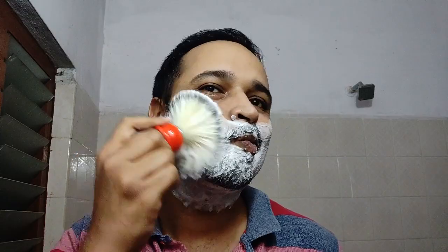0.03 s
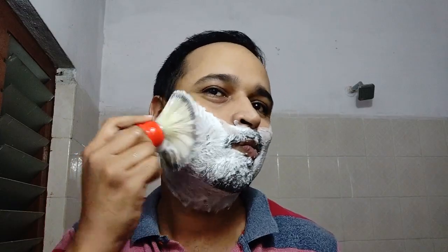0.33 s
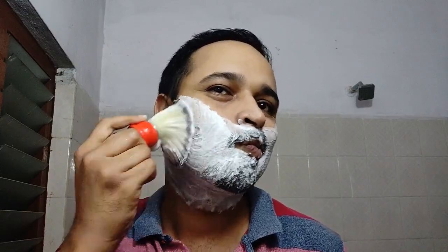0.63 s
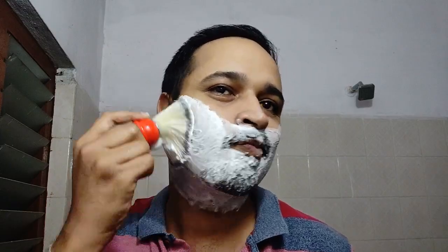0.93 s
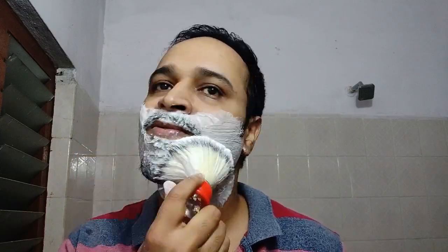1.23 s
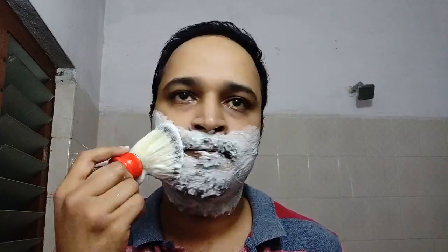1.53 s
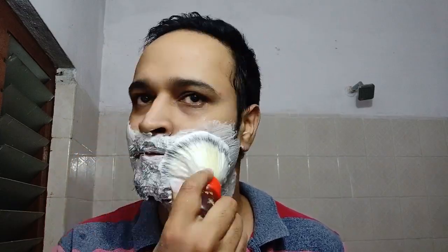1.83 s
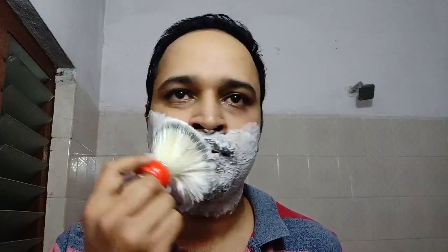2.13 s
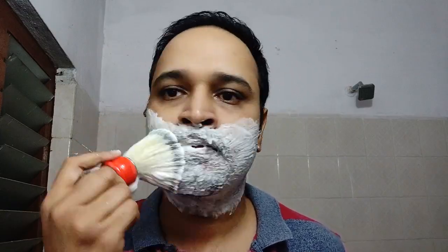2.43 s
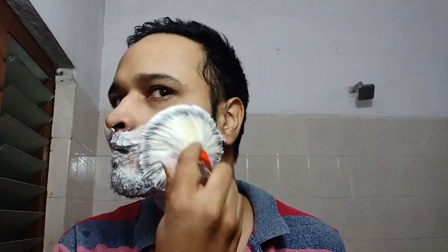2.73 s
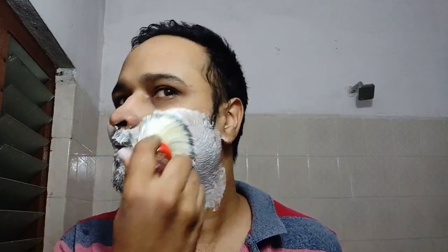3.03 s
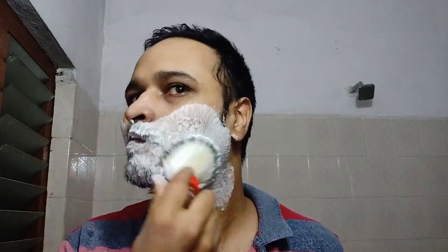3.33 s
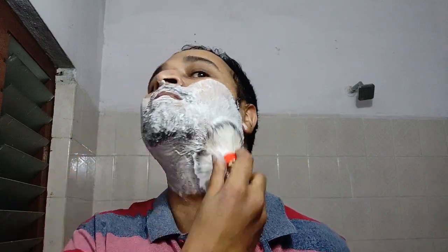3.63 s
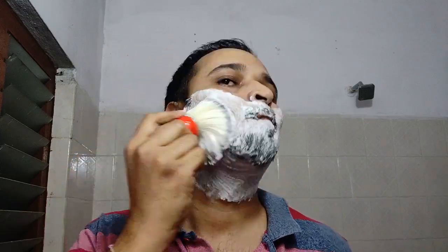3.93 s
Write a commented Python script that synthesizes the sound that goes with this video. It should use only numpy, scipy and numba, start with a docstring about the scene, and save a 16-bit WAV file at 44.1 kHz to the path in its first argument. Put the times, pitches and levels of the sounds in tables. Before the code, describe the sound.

A shaving brush swishes over lathered stubble throughout the four seconds, about ten soft, wet strokes a second, growing slightly louder, with scattered crackles of foam. Low air rumble on the microphone creeps in after 1 second, gives a short puff at about 1.6 seconds, peaks near 3 seconds and then eases. Steady hiss and a faint low hum of the tiled bathroom lie underneath.

```python
"""A tiled bathroom: a shaving brush works lather over stubble, about ten strokes a second.
Bristles flick and tiny bubbles burst as a fine hiss over the wet swish of the foam; squeezed pockets crackle.
Moving air booms and buffets on the two microphone ports, gusts once and peaks near three seconds.
Steady room hiss and a low building murmur lie underneath."""
import sys
import numpy as np
from scipy import signal
from scipy.fft import rfft, irfft
from scipy.io import wavfile
from scipy.ndimage import uniform_filter1d, map_coordinates
from numba import njit

SR = 44100
rng = np.random.default_rng(int(sys.argv[2]) if len(sys.argv) > 2 else 0)


def materialize(psi):
    """Save the field psi as 16-bit PCM at rate SR to the path in sys.argv[1].

    A 1-D psi becomes a single channel; in a 2-D psi each row is a channel.
    """
    bounded = np.clip(np.atleast_2d(psi).T, -1, 1)
    quanta = np.round(bounded * 32767).astype(np.int16)
    wavfile.write(sys.argv[1], SR, quanta)


N = 176400
TIME_S = np.arange(N) / SR
BUBBLES_PER_S, HAND_MOVES_PER_S = 3500, 7


def undb(db):
    """Decibels to gain."""
    return 10 ** (np.asarray(db) / 20)


def unit(x):
    """Scale to rms 1."""
    return x / np.sqrt(np.mean(x ** 2))


def curve(table, column=1):
    """Gain over time from one dB column."""
    rows = np.array(table)
    return undb(np.interp(TIME_S, rows[:, 0], rows[:, column]))


def colour(x, spectrum, column=1):
    """Filter by one dB column of a spectrum."""
    rows = np.array(spectrum)
    hz = np.maximum(np.arange(N // 2 + 1) * SR / N, 1)
    gain_db = np.interp(np.log(hz), np.log(rows[:, 0]), rows[:, column])
    return irfft(rfft(x) * undb(gain_db), N)


def walk(per_s):
    """Smooth random wander, rms 1."""
    step = int(SR / per_s)
    stairs = np.repeat(rng.standard_normal(N // step + 1), step)
    return unit(uniform_filter1d(stairs, step)[:N])


def envelope(start_s, attack_s, length_s, release_s):
    """Linear rise, hold until length_s after the start, exponential fall."""
    age_s = TIME_S - start_s
    return np.clip(age_s / attack_s, 0, 1) * np.exp(-np.maximum(age_s - length_s, 0) / release_s)


def grains(per_s, spread_db):
    """Dense clicks of uneven size, with independent sign at each port."""
    hits = rng.random(N) < per_s / SR
    size = undb(spread_db * np.clip(rng.standard_normal(N), -3, 3))
    return unit(hits * size * np.sign(rng.standard_normal((2, N))))


def pressure(layer, sag_db_per_s=25):
    """Rubbing strength of "bristle" or "foam": strokes ease off over the resting skin contact."""
    # (start [s], length [s], bristle level [dB], foam level [dB])
    strokes = [(0.013, 0.099, -54.5, -51), (0.124, 0.039, -52, -65), (0.187, 0.091, -47, -53.5),
               (0.275, 0.04, -48, -53), (0.335, 0.058, -47.5, -52), (0.437, 0.029, -45.5, -52),
               (0.532, 0.1, -49, -52.5), (0.635, 0.073, -47, -53), (0.722, 0.063, -51, -55),
               (0.847, 0.035, -47.5, -60), (0.966, 0.065, -47, -52), (1.08, 0.063, -48.5, -61),
               (1.174, 0.048, -45, -51), (1.255, 0.068, -46.5, -56.5), (1.339, 0.056, -48.5, -51),
               (1.448, 0.05, -47, -57.5), (1.566, 0.054, -44.5, -49), (1.653, 0.061, -48, -52.5),
               (1.747, 0.066, -45.5, -49.5), (1.862, 0.044, -45.5, -57.5), (1.936, 0.062, -44, -54),
               (2.034, 0.061, -47, -52.5), (2.124, 0.046, -42.5, -47), (2.205, 0.06, -46.5, -54.5),
               (2.294, 0.045, -45, -51), (2.388, 0.028, -47, -55), (2.458, 0.056, -44, -50.5),
               (2.553, 0.15, -48, -55.5), (2.678, 0.037, -45, -66), (2.807, 0.044, -39.5, -51.5),
               (2.847, 0.044, -47, -49.5), (2.929, 0.035, -39.5, -45.5), (3.026, 0.049, -42, -49.5),
               (3.14, 0.046, -42.5, -47), (3.251, 0.049, -42, -47.5), (3.38, 0.025, -39, -45),
               (3.472, 0.056, -42.5, -50), (3.59, 0.041, -41.5, -48.5), (3.697, 0.055, -44, -48.5),
               (3.773, 0.015, -49.5, -53), (3.928, 0.025, -39.5, -45.5)]
    # contact between strokes (time [s], bristle level [dB], foam level [dB])
    contact = [(0.0, -46.5, -52.5), (0.25, -51, -54), (0.5, -50.5, -53.5), (0.95, -49.5, -51),
               (1.1, -55.5, -62.5), (1.54, -54.5, -69), (1.7, -54.5, -59.5), (2.35, -53, -59),
               (2.95, -47.5, -53), (3.5, -48.5, -54.5), (4.0, -49.5, -55.5)]
    index = ("bristle", "foam").index(layer)
    power = curve(contact, column=index + 1) ** 2
    for start_s, length_s, *levels_db in strokes:
        eased = undb(levels_db[index] - sag_db_per_s * np.maximum(TIME_S - start_s, 0))
        power += (eased * envelope(start_s, 0.015, length_s, release_s=0.02)) ** 2
    return np.sqrt(2 * power)


def bristles():
    """Bristles flick over stubble; each port hears its own hiss spectrum."""
    # (frequency [Hz], left gain [dB], right gain [dB])
    hiss_spectrum = [(300, -52.5, -50), (1200, -43.5, -35), (1840, -11.5, -23), (2350, -15, -13.5),
                     (2610, -18, -18.5), (3160, -8.5, -8), (3800, -10.5, -10), (4190, -12, -11.5),
                     (4870, -8.5, -6.5), (5920, -15, -4), (6330, -8.5, -2), (6610, -29, 0),
                     (7190, -6.5, -10), (7640, -9.5, -16.5), (8460, -10.5, -27.5), (9060, -8.5, -56.5),
                     (9490, -18, -62)]
    left, right = grains(per_s=9000, spread_db=2)
    return unit(np.array([colour(left, hiss_spectrum, 1), colour(right, hiss_spectrum, 2)]))


def hand_echo(x, delay_s=0.001808, swing_s=0.000684, echo_db=-9):
    """Reflection between hand and cheek; its delay moves with the hand."""
    late_s = delay_s + swing_s * walk(HAND_MOVES_PER_S)
    echo = np.array([map_coordinates(port, [np.arange(N) - late_s * SR], order=1) for port in x])
    return x + undb(echo_db) * echo


@njit
def resonance(x, hz, width_hz):
    """State-variable band-pass, gain 1 at its moving centre."""
    y, band_state, low_state = np.empty(len(x)), 0., 0.
    for i in range(len(x)):
        g, damping = np.tan(np.pi * hz[i] / SR), width_hz / hz[i]
        band = (band_state + g * (x[i] - low_state)) / (1 + g * (g + damping))
        band_state = 2 * band - band_state
        low_state += 2 * g * band
        y[i] = damping * band
    return y


def lather_pocket(x, centre_hz=1610, width_hz=360., swing_octaves=0.073, ring_db=1):
    """A hollow in the lather rings at a pitch that shifts as it is kneaded."""
    hz = centre_hz * 2 ** (swing_octaves * walk(HAND_MOVES_PER_S))
    return x + undb(ring_db) * np.array([resonance(port, hz, width_hz) for port in x])


def foam():
    """Tiny bubbles burst as a wet, hollow swish."""
    # (frequency [Hz], gain [dB])
    swish_spectrum = [(150, -20), (400, -14.5), (600, -9), (800, -5.5), (1100, -2), (1550, -2.5),
                      (1950, -2.5), (2650, -7.5), (3600, -20.5), (8000, -59)]
    bursts = colour(grains(BUBBLES_PER_S, spread_db=1.5), swish_spectrum)
    return unit(lather_pocket(hand_echo(bursts)))


def tiles(x, t60_s=0.12, tail_db=-8):
    """Direct sound plus short reflections from tiled walls."""
    t = np.arange(SR // 3) / SR
    tail = rng.standard_normal((2, len(t))) * np.exp(-np.log(1000) * t / t60_s)
    tail *= undb(tail_db) / np.sqrt(np.sum(tail ** 2, axis=1, keepdims=True))
    reflections = signal.fftconvolve(x, tail, axes=1)[:, :N]
    return (x + reflections) / np.sqrt(1 + undb(tail_db) ** 2)


def brush(bristle_db=-2, foam_db=-1.3, flutter_db=1.14):
    """Bristles and foam follow the uneven pressure of the hand."""
    rub = undb(bristle_db) * bristles() * pressure("bristle")
    rub += undb(foam_db) * foam() * pressure("foam")
    return tiles(rub * undb(flutter_db * walk(per_s=110)))


def squeeze(layer, attack_s=0.0014, length_s=0.0084):
    """Burst strength of "fizz" or "wet" crackle as foam pockets are squeezed."""
    # (start [s], fizz level [dB], wet crackle level [dB])
    bursts = [(0.348, -81, -55), (0.548, -81, -49), (0.738, -92, -47), (0.905, -85, -52), (1.178, -78, -46),
              (1.374, -87, -47.5), (1.458, -71, -63), (1.563, -85, -45), (2.826, -57, -43.5),
              (3.267, -78, -42), (3.395, -67, -51), (3.61, -78, -47), (3.715, -84, -49),
              (3.937, -69, -46.5)]
    index = ("fizz", "wet").index(layer)
    return sum(undb(levels_db[index]) * envelope(start_s, attack_s, length_s, release_s=length_s)
               for start_s, *levels_db in bursts)


def fizz(stroke_db=-36.5):
    """The finest bubbles fizz faintly with each stroke and squeeze."""
    # (frequency [Hz], gain [dB])
    fizz_spectrum = [(8000, -54), (11000, -24), (12200, -3), (14500, -1), (15300, -25), (17000, -43)]
    strength = undb(stroke_db) * pressure("bristle") + squeeze("fizz")
    return strength * unit(colour(grains(BUBBLES_PER_S, spread_db=2.7), fizz_spectrum))


def room_hiss(level_db=-60.5):
    """Steady hiss of the room."""
    # (frequency [Hz], gain [dB])
    air_spectrum = [(30, 15), (120, 12), (300, -11), (1000, 8), (3000, -18.5), (6500, 22), (9000, -19)]
    return undb(level_db) * unit(colour(rng.standard_normal((2, N)), air_spectrum))


def murmur(level_db=-56):
    """Steady low murmur of the building."""
    # (frequency [Hz], gain [dB])
    murmur_spectrum = [(15, -1), (28, 8), (45, -5), (66, -5), (85, -1), (120, -3.5), (160, -16),
                       (240, -31.5), (500, -38), (2000, -70)]
    return undb(level_db) * unit(colour(rng.standard_normal((2, N)), murmur_spectrum))


def swirl(spectrum, even_s=0.041):
    """Narrow band of eddies of even strength, as a rotating phasor."""
    phasor = signal.hilbert(colour(rng.standard_normal(N), spectrum))
    power = uniform_filter1d(np.abs(phasor) ** 2, int(even_s * SR)) / 2
    return phasor / np.sqrt(power)


def boom(phasor, phase_rad, wander_rad=1.0):
    """Eddies reach both ports equally strongly; the phase between them wanders."""
    apart_rad = phase_rad + wander_rad * walk(per_s=18)
    return np.real(phasor * np.exp(.5j * np.array([apart_rad, -apart_rad])))


def upper_boom(phase_rad, swell_db=1, buffet_phase_rad=0.94):
    """Air booms near 120 Hz; buffets push the ports more nearly in phase."""
    # (frequency [Hz], gain [dB])
    boom_spectrum = [(20, -56), (60, -21), (85, -12), (102, -8), (119, -0.5), (140, -8.5), (175, -24),
                     (260, -70), (1000, -100)]
    # (time [s], level [dB])
    swell = [(0, -68), (.3, -55), (.55, -57), (.65, -50), (.92, -63.5), (1.1, -59), (1.22, -43.5),
             (1.3, -50), (1.39, -37.5), (1.47, -54.5), (1.56, -41.5), (1.78, -47.5), (1.9, -41), (2.1, -42),
             (2.2, -37), (2.33, -35.5), (2.43, -30), (2.52, -32), (2.62, -24.5), (2.75, -20), (2.83, -26),
             (2.95, -22), (3.04, -27.5), (3.3, -30.5), (3.45, -35.5), (3.55, -33), (3.62, -39), (4, -35.5)]
    # (time [s], offset [Hz])
    pitch_drift = [(0, 3.5), (1.9, -2.5), (2.22, 3.5), (2.45, -10), (2.55, -13.5), (2.65, 3), (2.78, 2),
                   (2.919, -14), (3.099, -21.5), (3.3, -9), (3.55, -16.5), (4, 2.5)]
    # (start [s], length [s], level [dB])
    buffets = [(1.369, 0.026, -37.5), (1.844, 0.051, -33.5), (1.94, 0.02, -33), (2.192, 0.057, -39),
               (2.364, 0.035, -26), (2.418, 0.024, -22.5), (2.639, 0.048, -23.5), (2.725, 0.045, -22),
               (2.875, .045, -19.5), (3.072, 0.03, -21), (3.526, 0.036, -29.5)]
    buffeting = sum(undb(db) * envelope(start_s, 0.014, length_s, release_s=0.013)
                    for start_s, length_s, db in buffets)
    strength = np.hypot(undb(swell_db) * curve(swell), buffeting)
    apart_rad = phase_rad + (buffet_phase_rad - phase_rad) * (buffeting / strength) ** 2
    drift_hz = np.interp(TIME_S, *np.array(pitch_drift).T)
    phasor = swirl(boom_spectrum) * np.exp(2j * np.pi * np.cumsum(drift_hz) / SR)
    return strength * boom(phasor, apart_rad)


def lower_boom(phase_rad, swell_db=1):
    """Air booms near 66 Hz."""
    # (frequency [Hz], gain [dB])
    boom_spectrum = [(12, -26), (26, -16.5), (34, -23.5), (45, -19.5), (56, -12.5), (66, 2.5), (78, -14.5),
                     (105, -29), (200, -64), (800, -100)]
    # (time [s], level [dB])
    swell = [(0, -82), (.55, -70), (.8, -52), (1.04, -49.5), (1.14, -36), (1.38, -41.5), (1.6, -54),
             (1.82, -40), (1.93, -42), (2.03, -34), (2.16, -42), (2.45, -60), (2.53, -27.5), (2.62, -47),
             (2.75, -32), (2.85, -33), (2.9, -24.5), (3.03, -25.5), (3.13, -30), (3.33, -28), (3.5, -39.5),
             (3.65, -40.5), (3.77, -39.5), (4, -41.5)]
    return undb(swell_db) * curve(swell) * boom(swirl(boom_spectrum), phase_rad)


def eddies(spectrum, correlation=-0.13, even_s=0.06):
    """Turbulence of even strength, pushing the ports partly in opposition."""
    mid, side = colour(rng.standard_normal((2, N)), spectrum)
    ports = np.sqrt(1 + correlation) * mid + np.sqrt(1 - correlation) * side * np.array([[1], [-1]])
    power = uniform_filter1d(np.mean(ports ** 2, axis=0), int(even_s * SR))
    return ports / np.sqrt(power)


def draught(port_phase_rad=1.76, rough_db=3):
    """Moving air on the ports: two booms with rough flutter above them."""
    # (frequency [Hz], gain [dB])
    rough_spectrum = [(30, -42.5), (100, -22.5), (175, -3.5), (228, 0), (260, -3), (290, -2.5),
                      (350, -15.5), (410, -20), (465, -18.5), (530, -12.5), (610, -16), (800, -21),
                      (1100, -26), (2000, -47.5), (6000, -89.5)]
    # (time [s], level [dB])
    rough_swell = [(0, -75), (1.15, -65), (1.28, -57.5), (1.39, -52.5), (1.54, -61.5), (1.73, -43),
                   (1.85, -56.5), (2.1, -54.5), (2.45, -51), (2.75, -40.5), (3.05, -40), (3.35, -44.5),
                   (3.7, -48.5), (3.87, -59), (4, -57)]
    booms = upper_boom(port_phase_rad) + lower_boom(port_phase_rad)
    return booms + undb(rough_db) * curve(rough_swell) * eddies(rough_spectrum)


def crackle():
    """Larger bubbles pop in wet clusters as the brush squeezes the foam."""
    # (frequency [Hz], gain [dB])
    pop_spectrum = [(300, -24), (900, -22), (1600, 1.5), (2100, -9), (2700, -5), (3400, -1), (4200, -13),
                    (6300, 7), (9000, -20)]
    pops = unit(colour(grains(per_s=1400, spread_db=0.5), pop_spectrum))
    return tiles(pops * squeeze("wet"))


def gust(start_s=1.623, attack_s=0.0033, length_s=0.044, split_hz=430, left_db=-32.5, right_db=-31.5):
    """A short rush of air hits the ports; its top dies before its bass."""
    # (frequency [Hz], gain [dB])
    rush_spectrum = [(20, -11), (60, -1), (150, -8), (235, -2.5), (350, -5.5), (520, -7.5), (615, -4),
                     (780, -11), (950, -10), (1200, -14.5), (1420, -25), (1950, -22), (2400, -29),
                     (3000, -55), (8000, -82)]
    rush = eddies(rush_spectrum)
    bass = signal.sosfiltfilt(signal.butter(2, split_hz, fs=SR, output="sos"), rush)
    thump = bass * envelope(start_s, attack_s, length_s, release_s=0.044)
    top = (rush - bass) * envelope(start_s, attack_s, length_s, release_s=0.023)
    return undb([[left_db], [right_db]]) * (thump + top)


def scene(edge_hz=9617):
    """Brush, crackle and hiss end at a steep treble edge; fizz lies above, air and murmur below."""
    hiss = brush() + crackle() + room_hiss()
    edge = signal.ellip(10, .2, 70, edge_hz, fs=SR, output="sos")
    return signal.sosfilt(edge, hiss) + murmur() + fizz() + draught() + gust()


def record(dry, top_hz=15500):
    """Steep low-pass on the whole mix."""
    return signal.sosfilt(signal.ellip(8, .2, 70, top_hz, fs=SR, output="sos"), dry)


dry = scene()
out = record(dry)
materialize(out)
```